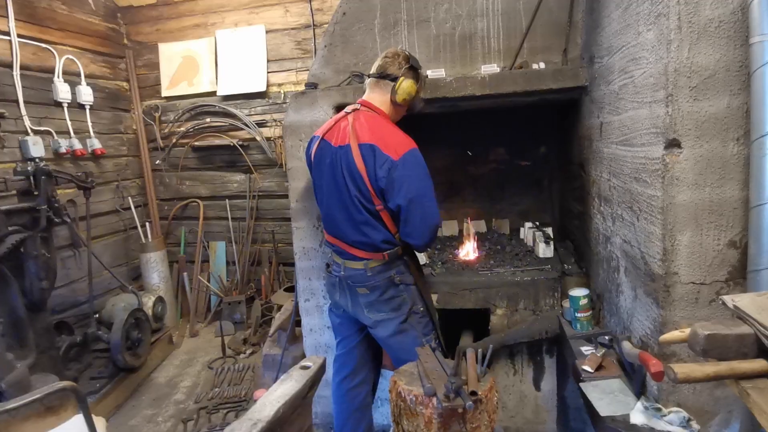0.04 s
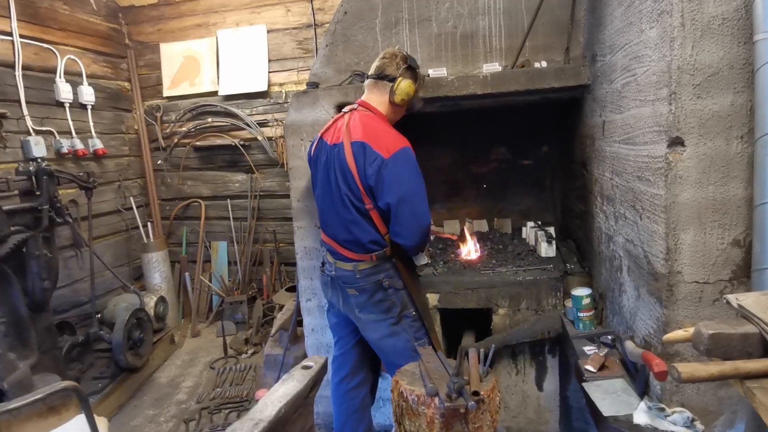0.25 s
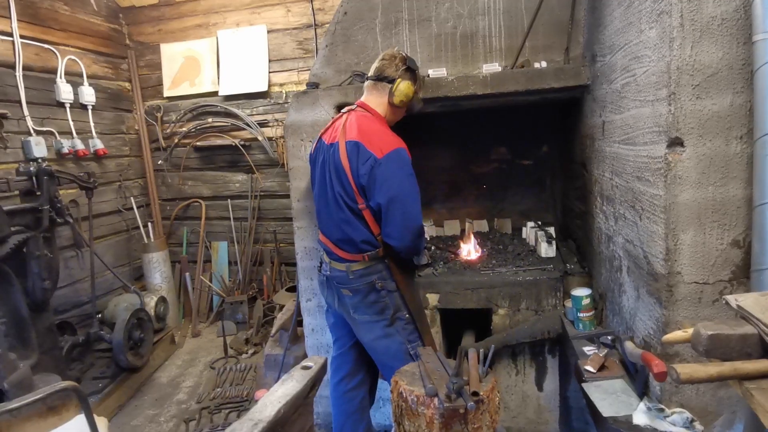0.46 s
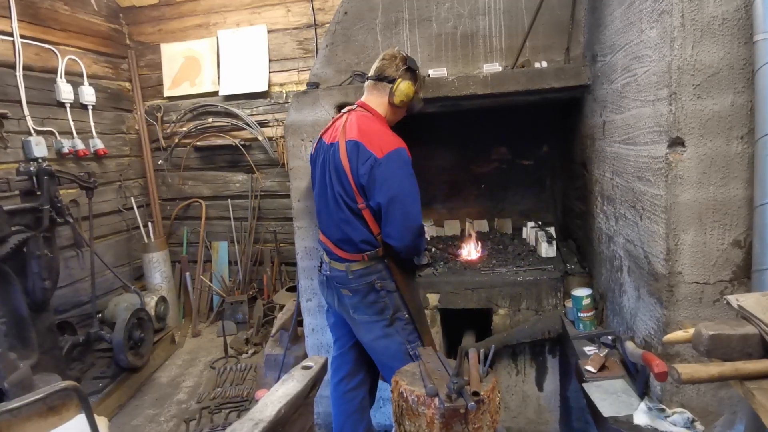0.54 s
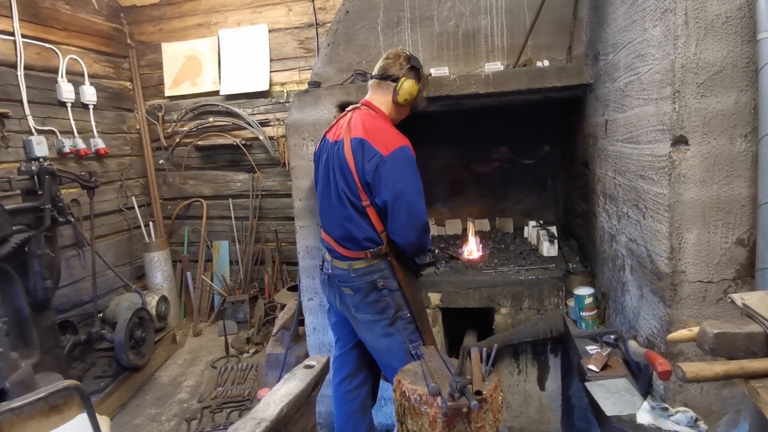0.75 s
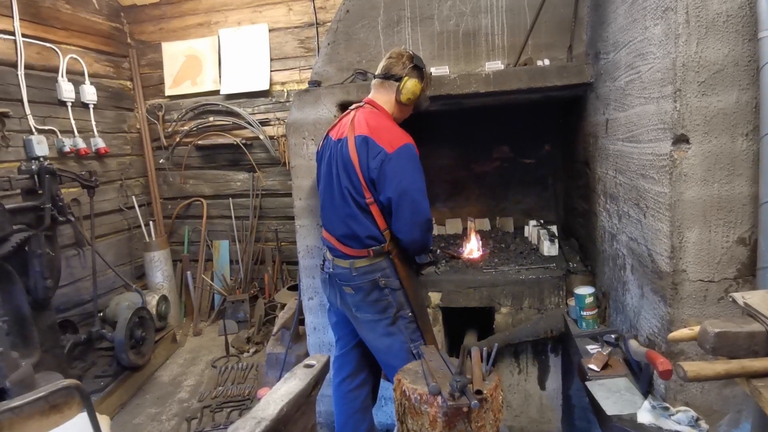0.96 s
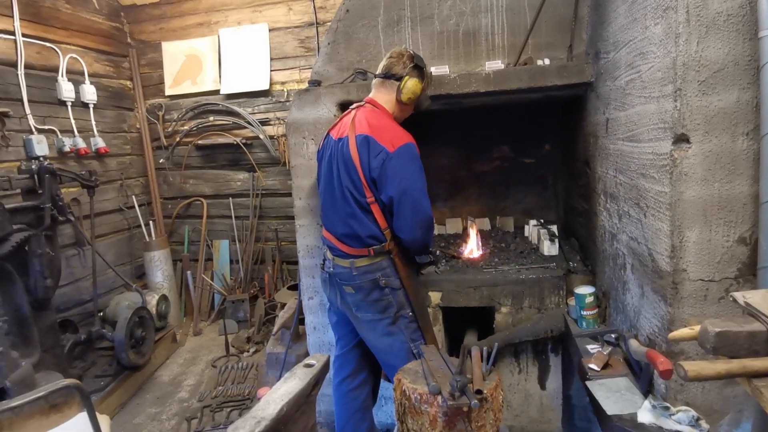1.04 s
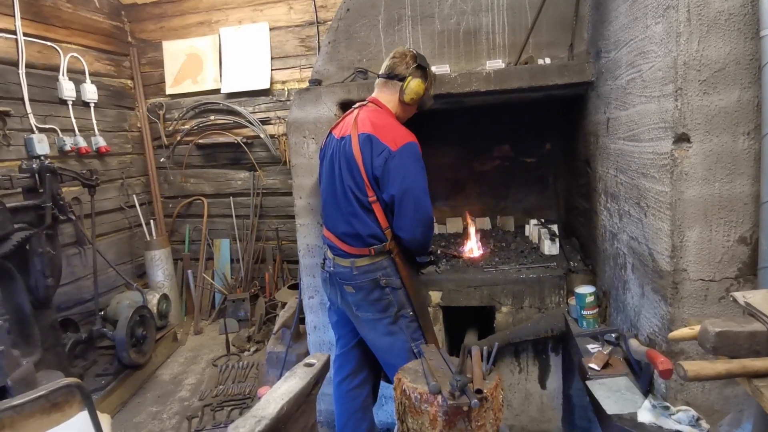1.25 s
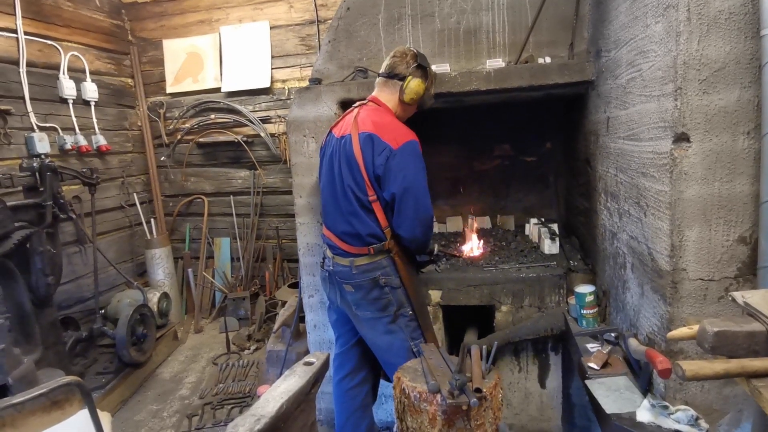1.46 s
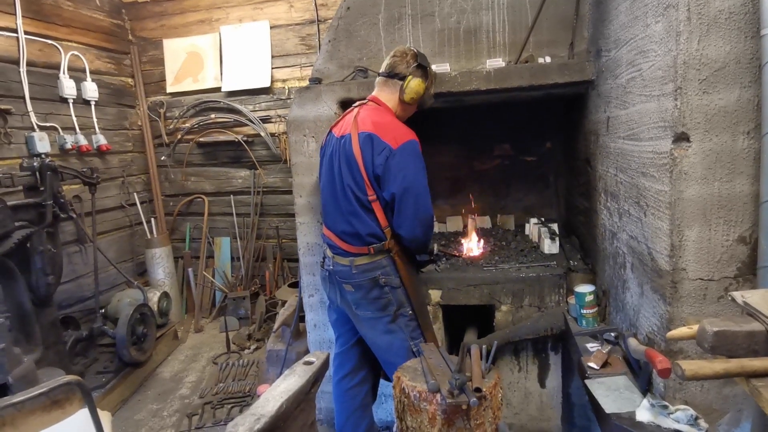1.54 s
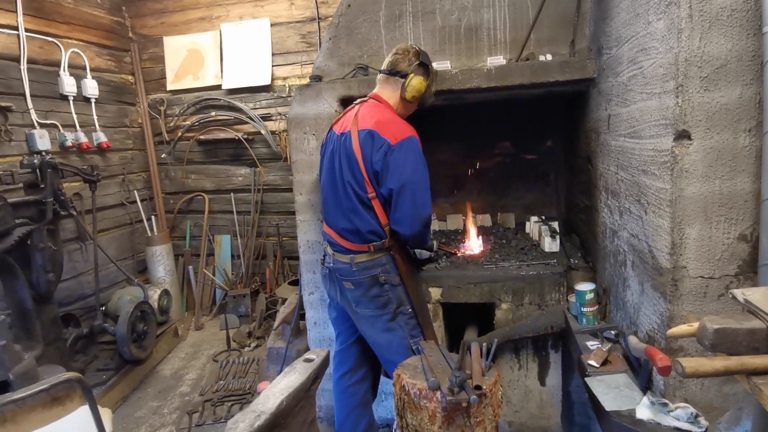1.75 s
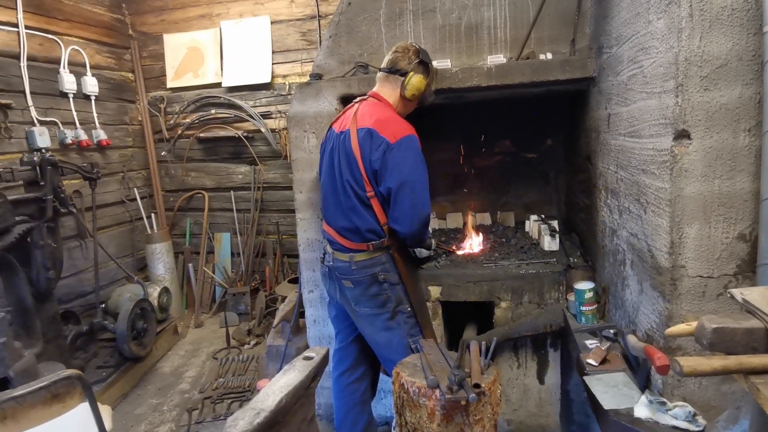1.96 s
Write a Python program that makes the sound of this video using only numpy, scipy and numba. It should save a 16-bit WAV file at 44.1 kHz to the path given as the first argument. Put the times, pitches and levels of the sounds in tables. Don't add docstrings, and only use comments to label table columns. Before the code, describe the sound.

Steady blower whine and booming draught in a forge, then gritty poker scraping and small metallic knocks.

```python
import sys
import numpy as np
from scipy import signal
from scipy.io import wavfile
from scipy.ndimage import uniform_filter1d, map_coordinates
from numba import njit

SR = 44100
rng = np.random.default_rng(int(sys.argv[2]) if len(sys.argv) > 2 else 0)


def undo_db(level):
    steps = np.asarray(level, float) / 20
    return 10 ** steps


def to_wav(s):
    ch = np.atleast_2d(s).T
    pcm = np.round(np.clip(ch, -1, 1) * 32767)
    wavfile.write(sys.argv[1], SR, pcm.astype(np.int16))


N = 88200


@njit
def svf(x, hz, width):
    out, band_state, low_state = np.empty(len(x)), 0., 0.
    g, damping = np.tan(np.pi * hz / SR), width / hz
    for i in range(len(x)):
        v = (band_state + g * (x[i] - low_state)) / (1 + g * (g + damping))
        band_state = 2 * v - band_state
        low_state += 2 * g * v
        out[i] = damping * v
    return out


def unit(x):
    return x / np.sqrt(np.mean(x ** 2))


def walk(rate):
    hold = int(SR / rate)
    steps = np.repeat(rng.standard_normal(N // hold + 1), hold)
    return 1.3 * uniform_filter1d(uniform_filter1d(steps, hold), hold)[:N]


def curve(table, axis=1):
    rows = np.array(table, float).T
    return np.interp(np.arange(N) / SR, rows[0], rows[axis])


def at_hz(table, hz):
    f, value = np.array(table, float).T
    return np.interp(np.log(hz), np.log(f), value)


def late(x, hz):
    # frequency in Hz, delay in ms.
    left_delay = [(150, .03), (555, .12), (664, .19), (764, .25), (864, .26), (1050, .36), (1600, .29),
                  (3000, .2)]
    heard_at = np.arange(N) - at_hz(left_delay, hz) * SR / 1000
    left = map_coordinates(x, [heard_at], order=1, mode="nearest")
    return np.array([left, x])


def split_pan(left_db):
    return undo_db(left_db * np.array([[.5], [-.5]]))


def band(hz, width):
    # frequency in Hz, shared part of the power 0-1.
    likeness = [(25, 0.9), (50, 0.92), (150, 0.98), (215, .87), (300, 0.94), (700, 0.6), (1200, 0.41),
                (4000, 0.05)]
    # frequency in Hz, left over right in dB.
    left_tilt = [(60, -1.5), (110, 2), (200, 0.5), (380, -2.5), (700, 0.5), (1290, -2.5), (2380, -1.0),
                 (4400, -2.5), (8120, -2), (15000, 8)]
    common, left, right = (unit(svf(svf(rng.standard_normal(N), hz, width), hz, width)) for _ in range(3))
    share = np.clip(at_hz(likeness, hz), 0, 1)
    both = np.sqrt(share) * late(common, hz) + np.sqrt(1 - share) * np.array([left, right])
    return split_pan(at_hz(left_tilt, hz)) * both


def motor():
    line_hz = [555.45, 663.68, 763.72, 863.7, 100.0, 199.9]
    # level in dB, left over right in dB, wobble in dB.
    whine_lines = [(-59.5, 3.5, 1.3), (-66.5, -0.5, 0.7), (-58, -6.5, 0.9), (-54.5, 1.7, 0.73)]
    # level in dB, left over right in dB, wobble in dB.
    hum_lines = [(-72, 14, .6), (-67, 18, 1.5)]
    drift_rad = .1
    out, t = 0, np.arange(N) / SR
    for hz, (db, left_db, wobble_db) in zip(line_hz, whine_lines + hum_lines):
        phase = 2 * np.pi * (hz * t + rng.random()) + drift_rad * walk(2.3)
        line = np.sin(phase) * undo_db(db + wobble_db * walk(7.7))
        out = out + np.sqrt(2) * late(line, hz) * split_pan(left_db)
    return out


def blown(hz, width):
    steadiness = 0.94
    x = band(float(hz), 1.84 * width)
    swelling = np.sqrt(uniform_filter1d(np.mean(x ** 2, axis=0), int(.5 * SR / width)))
    return unit(x / swelling ** steadiness)


def chimney():
    # time in seconds, level in dB.
    buffeting = [
        (0.0, -67),
        (0.08, -48),
        (0.2, -68),
        (0.47, -58),
        (0.57, -54),
        (1.0, -73),
        (1.04, -61.5),
        (1.76, -65),
        (1.91, -52),
        (2.0, -63),
    ]
    return blown(49.2, 13) * undo_db(curve(buffeting))


def hollows():
    boom_hz = [67, 99, 141.5, 187, 208, 237, 256, 295, 997, 1050, 1125, 1264, 1392, 1553]
    # width in Hz, level in dB, follows blast 0-1, follows roar 0-1.
    booms = [(11.9, -64, 0, 0.6), (10.4, -60, 0, .1), (5.03, -56.5, 1, 0), (10, -68, 0, 0.3),
             (13.9, -59.5, 0.06, 0.03), (6.9, -54.5, 0.29, 0.99), (16.4, -60.5, .05, 0.37),
             (17.6, -67, 0.28, 0.18), (10, -73, 0.7, 0.6), (46, -69.5, .05, .05), (46.4, -74.5, .05, .05),
             (9.2, -78, .05, .05), (8.85, -77.5, 0.3, 0.3), (10.9, -77.5, 0.2, .05)]
    # time in seconds, blast in the duct in dB, fire's roar under the hood in dB.
    surges = [(0.0, -47, -51), (0.14, -69.5, -65), (0.2, -57, -56.5), (0.6, -65, -52.5),
              (0.66, -52.5, -60.5), (0.7, -58, -47.5), (0.82, -52.5, -60.5), (0.96, -60, -51.5),
              (1.11, -65.5, -64.5), (1.25, -52, -48), (1.3, -57, -63), (1.41, -58.5, -49),
              (1.58, -67.5, -57.5), (1.61, -59, -50), (1.71, -60.5, -67.5), (1.75, -54, -53.5),
              (1.82, -49.5, -55), (2.0, -60, -45)]
    blast, roar = curve(surges, axis=1), curve(surges, axis=2)
    blast_swing, roar_swing = blast - blast.mean(), roar - roar.mean()
    out = 0
    for hz, (width, db, to_blast, to_roar) in zip(boom_hz, booms):
        out = out + blown(hz, width) * undo_db(db + to_blast * blast_swing + to_roar * roar_swing)
    return out


def air():
    # frequency in Hz, density in dB per Hz.
    duct_rush = [(25, -20.5), (45, -12.5), (165, -15.5), (270, -10), (420, -19.5), (900, -20.5),
                 (1300, -25), (1700, -28.5)]
    # frequency in Hz, density in dB per Hz.
    coal_hiss = [(2200, -32), (3300, -37.5), (5150, -35.5), (5800, -47), (7700, -42.5), (8800, -53.5),
                 (11000, -51.5), (15500, -57.5)]
    level_db, swell_db, flicker_db = -55.5, .3, .7
    out, swell = 0, walk(0.55)
    for hz in 22 * 2 ** np.arange(0, 9.6, 1 / 4):
        band_db = at_hz(duct_rush + coal_hiss, hz) + 10 * np.log10(hz)
        moving_db = band_db + swell_db * swell + flicker_db * walk(9)
        out = out + undo_db(moving_db) * band(hz, hz / 3.48)
    return unit(out) * undo_db(level_db)


def drag():
    # time in seconds, effort in dB, brightness in dB per octave.
    strokes = [(0.6, -99, -3), (0.76, -91, -2), (0.778, -81, -5), (0.896, -82, 0.1), (1.022, -72.5, -2),
               (1.106, -81, -3), (1.218, -85, 0.1), (1.224, -72, -3), (1.298, -94, 0.1), (1.34, -82, 0.1),
               (1.362, -86, 4), (1.4, -72, -3), (1.48, -79.5, -2), (1.488, -91, 0.1), (1.614, -79, 4),
               (1.748, -79, -6), (1.934, -75, -3), (1.97, -83, 4)]
    grains_per_s, spread_db, level_db = 2300, 2, -0.5
    hits = (rng.random(N) < grains_per_s / SR) * rng.choice([-1, 1], N)
    grains = hits * undo_db(spread_db * rng.exponential(size=N))
    touching = np.arange(N) / SR > strokes[0][0]
    return unit(grains) * undo_db(curve(strokes) + level_db) * touching, curve(strokes, axis=2)


def knocks():
    # start in seconds, peak in dB, brightest near in Hz, T60 in seconds.
    strikes = [(.789, -69, 8500, .06), (1.1323, -63.5, 7000, .05), (1.1894, -63, 7000, 0.035),
               (1.2226, -55.5, 3570, 0.047), (1.2240, -60, 9400, 0.047), (1.384, -67, 9000, .06),
               (1.406, -65, 7000, 0.052), (1.4694, -65, 6000, .03), (1.611, -65, 5500, 0.06),
               (1.7194, -62, 6950, 0.026), (1.8594, -60, 6500, 0.024), (1.9344, -57, 13000, .01)]
    level_db = -4.5
    t, out, rattle = np.arange(N) / SR, np.zeros(N), rng.standard_normal(N)
    for start, db, hz, t60 in strikes:
        decay = (t > start) * undo_db(db + level_db - 60 * np.abs(t - start) / t60)
        out += svf(rattle * decay, float(hz), 1.1 * hz)
    return out


def in_room(dry):
    right_db, wet_db, t60_s = 4.5, -3, .18
    t = np.arange(SR // 2) / SR
    tail = rng.standard_normal((2, SR // 2)) * undo_db(-60 * t / t60_s)
    tail = tail / np.sqrt(np.sum(tail[0] ** 2))
    wet = signal.fftconvolve(dry[None], tail, axes=1)[:, :N]
    return late(dry, 5000) * split_pan(-right_db) + undo_db(wet_db) * wet


def poker():
    ring_hz = [2505, 2950, 4300, 5100, 6800, 7470, 7950, 9200, 10750, 11600]
    # level when dragged in dB, level when knocked in dB, width in Hz.
    rings = [(1, 3, 52), (-7, 7, 310), (-2.5, -7, 460), (-5.5, 1, 390), (0, -14, 460), (6.5, 4.5, 140),
             (-5, 2.5, 200), (-9.5, -25, 700), (-8, -2, 300), (-11, -7, 350)]
    grit_db, crack_db = -6.5, -2.5
    dragged, bright = drag()
    knocked = knocks()
    dry = undo_db(grit_db + bright) * svf(dragged, 11800., 10000.) + undo_db(crack_db) * knocked
    for hz, (drag_db, knock_db, width) in zip(ring_hz, rings):
        tilt_db = bright * np.log2(hz / 6000)
        push = undo_db(drag_db + tilt_db) * dragged + undo_db(knock_db) * knocked
        dry = dry + np.sqrt(3000 / width) * svf(push, float(hz), float(width))
    return in_room(dry)


def scene():
    return motor() + chimney() + hollows() + air() + poker()


def roll_off(x):
    return signal.sosfilt(signal.butter(12, 15600, fs=SR, output="sos"), x)


def record(dry):
    mix = dry - .0003
    return roll_off(mix)


dry = scene()
out = record(dry)
to_wav(out)
```